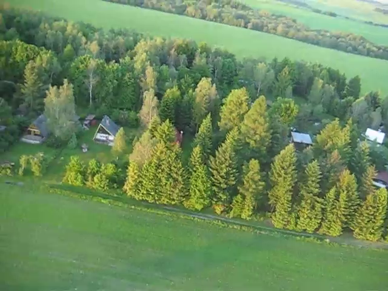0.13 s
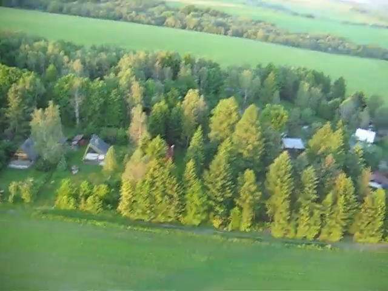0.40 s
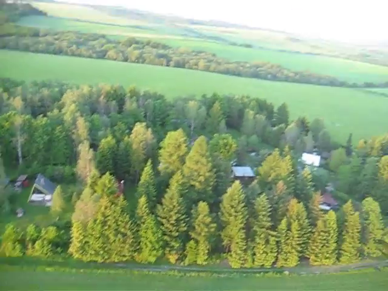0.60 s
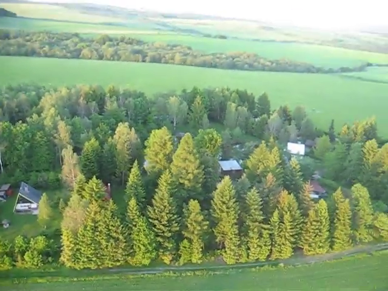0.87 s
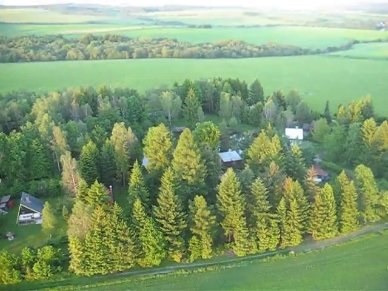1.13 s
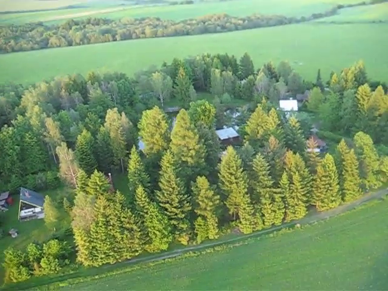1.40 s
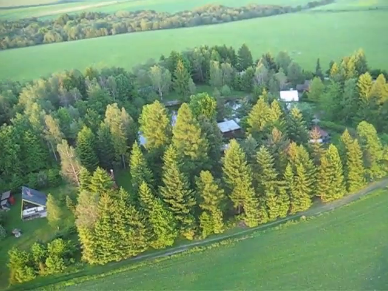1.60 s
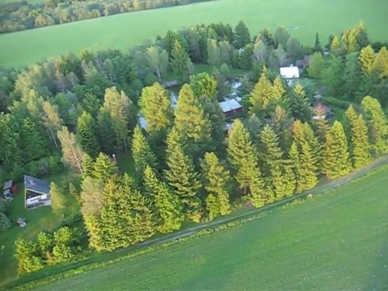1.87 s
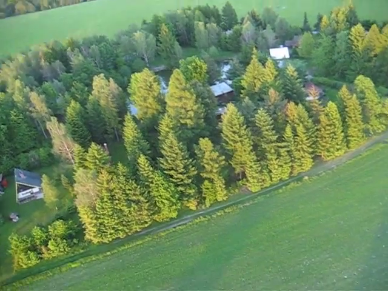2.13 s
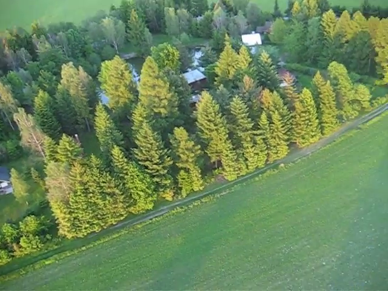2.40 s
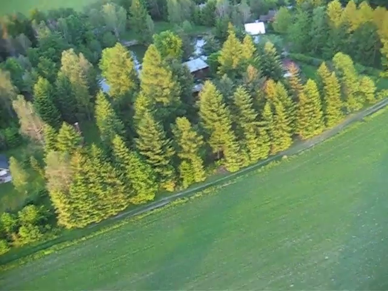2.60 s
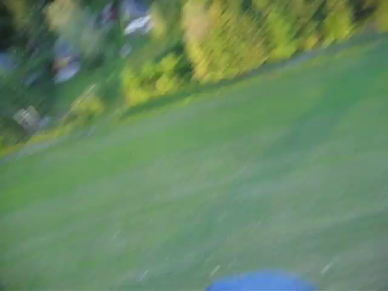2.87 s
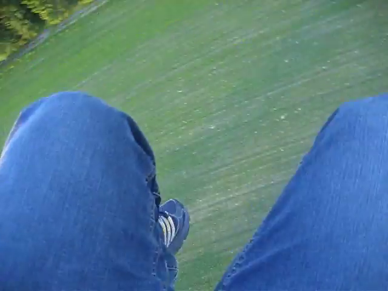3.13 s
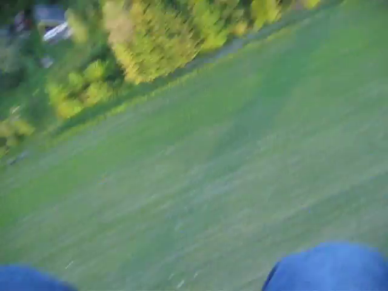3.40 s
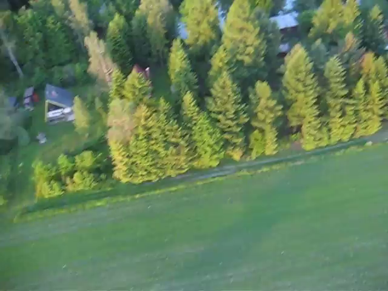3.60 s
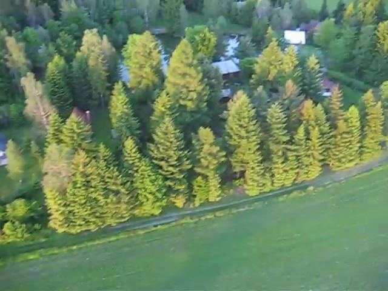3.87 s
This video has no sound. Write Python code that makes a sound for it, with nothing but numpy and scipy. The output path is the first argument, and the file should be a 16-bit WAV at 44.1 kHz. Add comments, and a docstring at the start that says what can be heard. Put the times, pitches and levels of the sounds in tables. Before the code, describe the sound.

A powered paraglider motor roars without pause: a low, raspy two-stroke drone, propeller hum and rapid blade slaps blurring into a buzz, with a slight metallic ring and rushing turbulent air. Pitch sags slightly throughout. From about 1.2 seconds the slaps gradually soften. Low wind rumbles unevenly, with a small gust near 1 second and a strong one around 3.2-3.3. Close, dull, overloaded small microphone outdoors.

```python
"""In the open sky, a powered paraglider in flight, heard by a small camera held by the pilot.
A one-cylinder two-stroke drives the propeller through a reduction: both hum as stacks of sines.
The blades slap as short pulses where they cut the wakes of the cage struts, and the cage rings on.
Noise bands make the roar of turbulent air around the propeller, low noise makes the wind buffeting
the microphone, and the overloaded input rounds off the peaks."""
import sys
import numpy as np
from scipy import signal
from scipy.io import wavfile

SR = 44100
rng = np.random.default_rng(int(sys.argv[2]) if len(sys.argv) > 2 else 0)


def field_ratio(decibels):
    """Amplitude ratio for a level in dB (20 dB per decade); scalars and array-likes work."""
    return 10 ** (np.asarray(decibels, dtype=float) / 20)


def dump(signal):
    """Clip the signal to [-1, 1] and save it as 16-bit WAV at the path in sys.argv[1]."""
    limited = np.clip(np.atleast_2d(signal).T, -1, 1)
    pcm = np.round(limited * 32767).astype(np.int16)
    wavfile.write(sys.argv[1], SR, pcm)


N = 176400
TIME = np.arange(N) / SR   # s

# steady wind on the microphone, before its lumps: (time [s], level [dB rms])
WIND_LEVEL = [(0, -27), (.4, -35), (.7, -26.5), (1.3, -40), (2.0, -34.5), (2.5, -28), (2.9, -36),
              (3.5, -34.5), (4, -29.5)]
# gusts added to the steady wind: (time [s], peak level [dB rms], spread of the bell-shaped swell [s])
WIND_GUSTS = [(0.991, -29.5, 0.053), (3.221, -16, 0.029), (3.322, -21.5, 0.047)]
# slow rumble of the wind: (time [s], level [dB rms])
RUMBLE_LEVEL = [(0, -44), (.5, -59), (1.0, -40), (1.3, -41), (1.9, -33.5), (2.7, -42.5), (4, -41)]
# tone colour of the air around the propeller: (frequency [Hz], relative density [dB per Hz])
ROAR_SPECTRUM = [(40, -31.5), (100, -3), (200, 1.5), (400, -5.5), (700, -3.5), (1100, -8), (1700, -14.5),
                 (2500, -20.5), (3800, -28), (5200, -35), (7000, -37.5)]
# propeller speed: (time [s], blade passes per second [Hz])
BLADE_RATE = [(0.0, 68.39), (0.222, 66.946), (0.444, 67.033), (0.667, 67.024), (0.889, 66.99),
              (1.111, 66.531), (1.333, 66.572), (1.556, 66.243), (1.778, 66.339), (2.0, 65.908),
              (2.222, 65.554), (2.444, 65.635), (2.667, 65.307), (2.889, 64.765), (3.111, 64.591),
              (3.333, 64.527), (3.556, 64.379), (3.778, 64.289), (4.0, 64.323)]
# camera turning away from the propeller: (time [s], turn [0-1], gain of slaps and roar [dB])
CAMERA_TURN = [(0, 0, -1.5), (.3, 0, -1), (.6, 0, -1.5), (.9, 0, 0), (1.2, .15, -.5), (1.5, .28, -1),
               (1.9, 0.6, 0), (2.3, .55, -1.5), (2.6, .7, -0.5), (3.0, 0.8, -3.5), (3.3, 0.88, -1.5),
               (3.6, 0.9, -3.5), (4, 0.6, -3)]
# exhaust note: (multiple of the firing rate, level facing, half turned, turned away [dB rms])
EXHAUST_PARTIALS = [(1, -27, -28.5, -25.5), (2, -26.5, -27, -31.5), (3, -27.5, -32, -28.5),
                    (4, -36.5, -40.5, -37), (5, -30.5, -30.5, -33), (6, -32, -34, -38.5),
                    (7, -38, -34.5, -34), (8, -38, -35, -37.5), (9, -33.5, -36.5, -36),
                    (10, -38.5, -48, -48.5)]
# propeller hum: (multiple of the blade rate, level facing, half turned, turned away [dB rms])
BLADE_PARTIALS = [(1, -21.5, -20.5, -21.5), (2, -20, -28, -30), (3, -25, -32, -44.5), (4, -38, -34, -38),
                  (5, -25.5, -30.5, -37.5), (6, -30, -40.5, -31.5), (7, -34, -28, -34),
                  (8, -40.5, -37.5, -39), (10, -39.5, -36.5, -41)]
# cage struts: (place in the blade cycle [0-1], push +1 or pull -1)
STRUT_POSITIONS = [(.522, 1), (.254, -1), (.982, -1)]
# sound of each strut, same order: (base slap level [dB], lift of the roar's treble [dB],
# share of the slap that sets the cage ringing, pitch factor, slap change when turned away [dB])
STRUT_SOUND = [(-11, 4, 0.025, 1.116, -2.5), (-12.5, -0.5, 0.059, 0.44, 1.5), (-15, 4.5, 0.098, 0.7, -7)]


def in_time(rows):
    """Columns of a curve, joined by straight lines, at every sample."""
    s, *columns = np.transpose(rows)
    return [np.interp(TIME, s, c) for c in columns]


def rms_one(x):
    """Scales to rms 1."""
    return x / np.sqrt(np.mean(x ** 2) + 1e-20)


def drift(rate_hz):
    """Slow chance of spread 1: noise twice through a one-pole low-pass, run at a twentieth of SR."""
    r = np.exp(-40 * np.pi * rate_hz / SR)
    noise = rng.standard_normal(N // 20 + 3002)
    slow = signal.lfilter([1], [1, -2 * r, r * r], noise)[3000:]   # the filter has settled by here
    return np.interp(np.arange(N) / 20, np.arange(len(slow)), rms_one(slow))


def band(x, low_hz, high_hz, order=2):
    """Butterworth band-pass."""
    return signal.sosfilt(signal.butter(order, [low_hz, high_hz], "band", fs=SR, output="sos"), x)


def wind():
    """Wind on the microphone port: lumpy low noise swelling with the gusts, over a slow rumble."""
    low_hz, high_hz = 90, 520
    lumpy_db, lumpy_hz = 2.0, 25
    rumble_hz = 27.3

    level = field_ratio(in_time(WIND_LEVEL)[0])
    for s, peak_db, spread_s in WIND_GUSTS:
        level = level + field_ratio(peak_db) * np.exp(-.5 * ((TIME - s) / spread_s) ** 2)
    buffet = rms_one(band(rng.standard_normal(N), low_hz, high_hz, order=3))
    buffet = buffet * level * field_ratio(lumpy_db * drift(lumpy_hz))

    rumble = rms_one(band(rng.standard_normal(N), rumble_hz, 2 * rumble_hz))
    return buffet + rumble * field_ratio(in_time(RUMBLE_LEVEL)[0])


def wake(cycles, place):
    """0-1 swell as a blade crosses a strut's wake: quick rise, slightly slower fall."""
    rise_cycles, fall_cycles = 0.024, 0.027
    after = (cycles - place + .5) % 1 - .5
    return np.exp(-.5 * (after / np.where(after < 0, rise_cycles, fall_cycles)) ** 2)


def roar(cycles):
    """Turbulent air in flickering half-octave bands; the treble throbs each pass and swells at wakes."""
    level_db = -21
    throb_db, throb_place = 2.0, .03   # place in the blade cycle
    uneven, uneven_hz = 0.27, 30.0   # how far the wake swells vary, as a share of themselves
    patchy_db, shared_patchy_hz, band_patchy_hz = 1, 0.67, 5.7
    lumpy_db, lumpy_hz = 1.6, 230
    bright_hz = 450

    lift_db = 0
    for (place, _), (_, strut_lift_db, *_) in zip(STRUT_POSITIONS, STRUT_SOUND):
        lift_db = lift_db + strut_lift_db * wake(cycles, place)
    lift_db = lift_db * (1 + uneven * drift(uneven_hz))
    lift_db = lift_db + throb_db * np.cos(2 * np.pi * (cycles - throb_place))
    shared_db = patchy_db * drift(shared_patchy_hz) + lumpy_db * drift(lumpy_hz)

    hz, density_db = np.transpose(ROAR_SPECTRUM)
    edges = 35 * 2 ** np.arange(0, 8, .5)   # Hz
    white = rng.standard_normal((2, N))   # neighbouring bands take turns, so they stay independent
    out = 0
    for k, (low, high) in enumerate(zip(edges, edges[1:])):
        mid = np.sqrt(low * high)
        bright = 1 / (1 + (bright_hz / mid) ** 2)
        gain_db = np.interp(np.log(mid), np.log(hz), density_db)
        gain_db = gain_db + bright * (lift_db + shared_db) + patchy_db * drift(band_patchy_hz)
        out = out + field_ratio(gain_db) * band(white[k % 2], low, high)
    return field_ratio(level_db) * rms_one(out)


def hum(cycles, partials, lead_cycles, shift_cycles, inverted, turn):
    """Sines on multiples of a rotation; some arrive inverted, higher ones waver more in level and timing."""
    waver_db, waver_hz, wander_cycles = 1.2, 4.0, .015
    full_waver_order = 5   # lower partials are steadier in level
    out = 0
    for k, *pose_db in partials:
        k = round(k)
        loose = min(1, k / full_waver_order)
        level_db = np.interp(turn, [0, .5, 1], pose_db) + loose * waver_db * drift(waver_hz)
        phase = k * (cycles + lead_cycles) + shift_cycles + (k in inverted) / 2
        phase = phase + wander_cycles * np.sqrt(k - 1) * drift(waver_hz)
        out = out + np.sqrt(2) * field_ratio(level_db) * np.cos(2 * np.pi * phase)
    return out


def exhaust_note(cycles, turn):
    """Two-stroke exhaust: harmonics of the firing rate, tied to the blade rate by the reduction."""
    firings_per_pass = 1.1626
    return hum(firings_per_pass * cycles, EXHAUST_PARTIALS, .383, -.43, [2, 3, 4], turn)


def propeller_hum(cycles, turn):
    """Propeller tone: harmonics of the blade-pass rate."""
    return hum(cycles, BLADE_PARTIALS, .225, -.15, [4], turn)


def slap_pulse(t, pitch):
    """Pressure pulse of one slap: a skewed, bell-shaped burst with a sharp edge; t in s from its centre."""
    slap_hz, width_hz, skew_rad = 1100, 940, .7
    tail_stretch = 1.07   # the pulse dies more slowly than it rises
    crack_db, crack_hz = -14.5, 2450   # sharp edge
    bell = np.exp(-(np.pi * width_hz * t / np.where(t > 0, tail_stretch, 1)) ** 2 / 2)
    burst = bell * np.cos(2 * np.pi * slap_hz * pitch * t + skew_rad)
    edge = 2 * np.pi * crack_hz * t
    return burst - field_ratio(crack_db) * edge * np.exp(.5 - edge ** 2 / 2)


def cage_ring(knocks, turn):
    """Cage as one damped resonance struck by the slaps; it fades as the camera turns away."""
    cage_hz, t60_s, fade_db = 910, 0.081, -9
    r = field_ratio(-60 / (t60_s * SR))
    w = 2 * np.pi * cage_hz / SR
    ring = signal.lfilter([0, np.sin(w)], [1, -2 * r * np.cos(w), r * r], knocks + 1e-18)
    return ring * field_ratio(fade_db * turn)


def slaps(cycles, turn):
    """A pulse as each blade cuts a strut's wake, varying in strength, pitch and timing; the cage rings on."""
    jitter_s, pitch_spread, strength_spread_db = .00008, 0.055, 1.5
    out, knocks = np.zeros(N + SR), np.zeros(N + SR)
    passes = np.arange(int(cycles[-1]) + 1)
    span = np.arange(-150, 151)   # samples around each slap
    for (place, sign), (slap_db, _, ringing, pitch, away_db) in zip(STRUT_POSITIONS, STRUT_SOUND):
        chance = rng.standard_normal((len(passes), 3))   # timing, pitch, strength
        s = np.interp(passes + place, cycles, TIME) + jitter_s * chance[:, 0]
        where = (s * SR).astype(int)[:, None] + span
        # squeezing or stretching time shifts the pitch of each slap
        t = (where / SR - s[:, None]) * np.exp(pitch_spread * chance[:, 1:2])
        level_db = slap_db + away_db * np.interp(s, TIME, turn)
        # lopsided strengths: mostly strong slaps, now and then a much weaker one
        level_db = level_db - strength_spread_db * (np.abs(chance[:, 2]) * 1.15 - 2.02)
        size = sign * field_ratio(level_db)
        np.add.at(out, np.clip(where, 0, None), slap_pulse(t, pitch) * size[:, None])
        np.add.at(knocks, (s * SR).astype(int), -ringing * size)
    return out[:N] + cage_ring(knocks[:N], turn)


def scene():
    """Wind, roar, exhaust and propeller summed at one microphone."""
    cycles = np.cumsum(in_time(BLADE_RATE)[0]) / SR   # blade passes so far
    turn, air_db = in_time(CAMERA_TURN)
    air = field_ratio(air_db) * (roar(cycles) + slaps(cycles, turn))
    mix = wind() + air + exhaust_note(cycles, turn) + propeller_hum(cycles, turn)
    return mix[None]


def low_pass(x):
    """Removes everything above the highest recorded frequency."""
    return signal.sosfilt(signal.butter(12, 6100, fs=SR, output="sos"), x)


def record(dry):
    """The input overloads, a coupling capacitor lets flat tops sag, the top is cut; silence comes first."""
    input_bias, clip_top, clip_hardness = .04, .31, 5.0   # the bias makes the overload lopsided
    coupling_hz, cutoff_hz = 70, 5380
    offset, start_s = .004, .0362
    x = dry + input_bias
    x = x / (1 + np.abs(x / clip_top) ** clip_hardness) ** (1 / clip_hardness)
    x = signal.lfilter(*signal.butter(1, coupling_hz, "high", fs=SR), x)
    x = signal.sosfilt(signal.butter(16, cutoff_hz, fs=SR, output="sos"), x) + offset
    mix = x * (TIME > start_s)
    return low_pass(mix)


dry = scene()
out = record(dry)
dump(out)
```